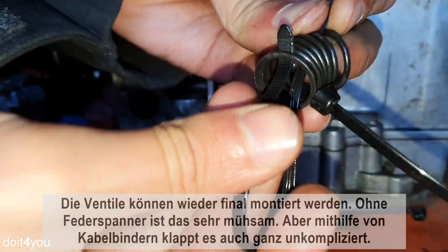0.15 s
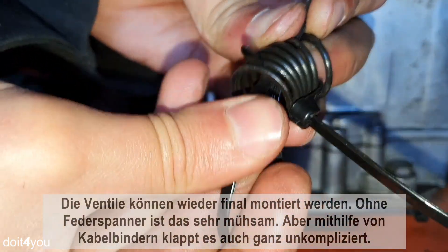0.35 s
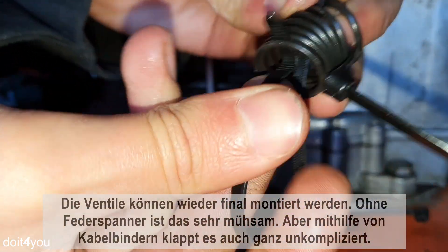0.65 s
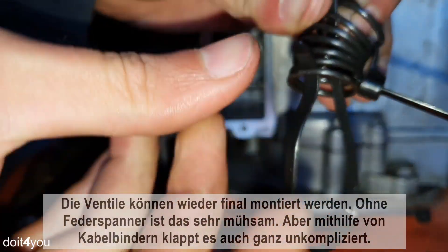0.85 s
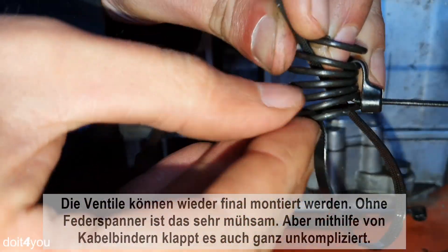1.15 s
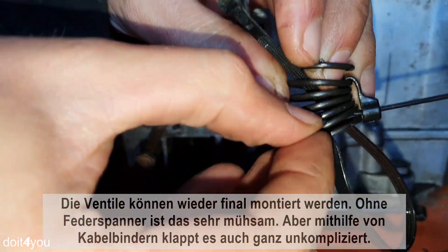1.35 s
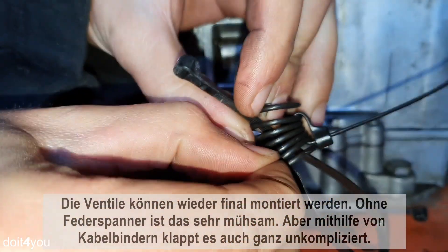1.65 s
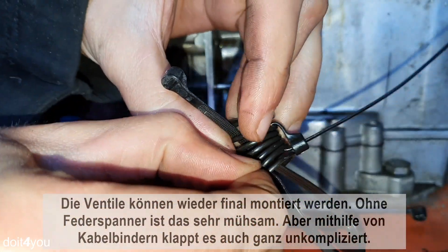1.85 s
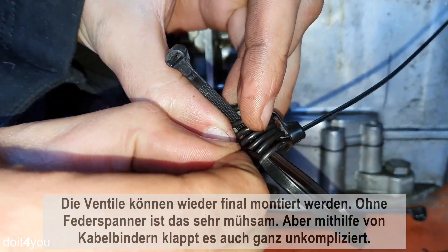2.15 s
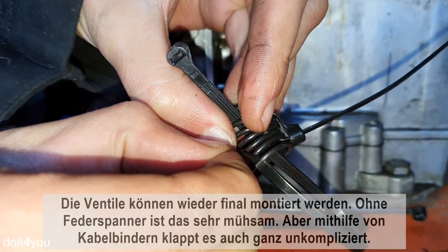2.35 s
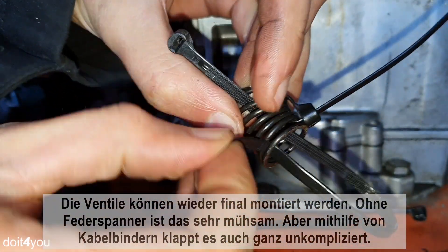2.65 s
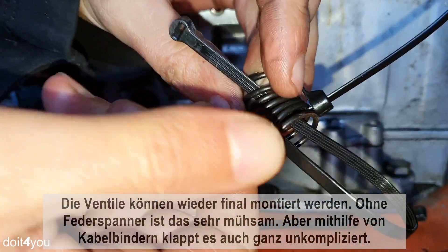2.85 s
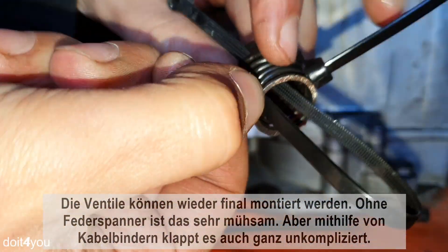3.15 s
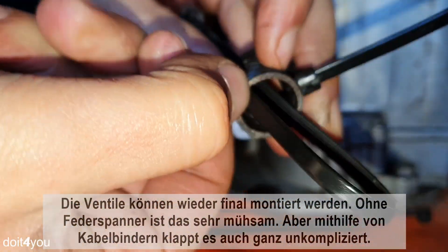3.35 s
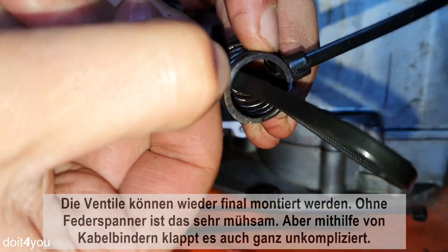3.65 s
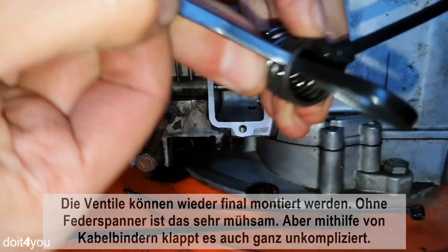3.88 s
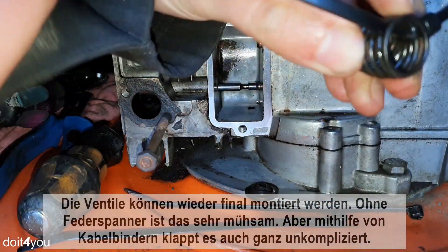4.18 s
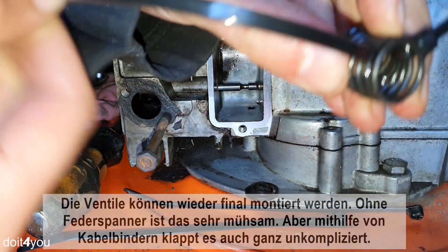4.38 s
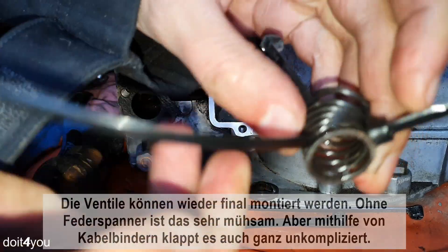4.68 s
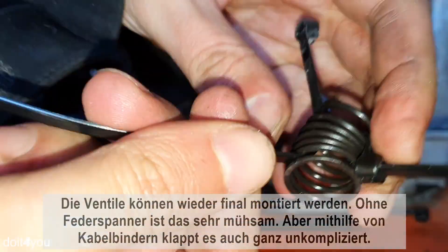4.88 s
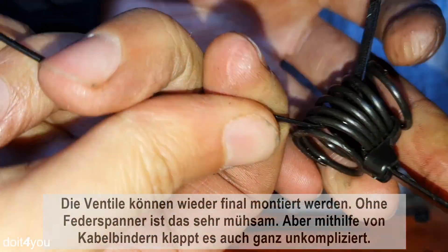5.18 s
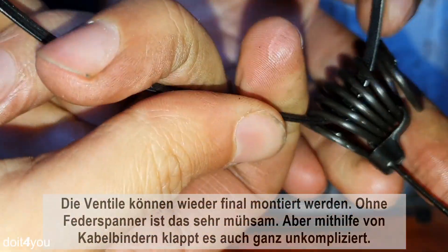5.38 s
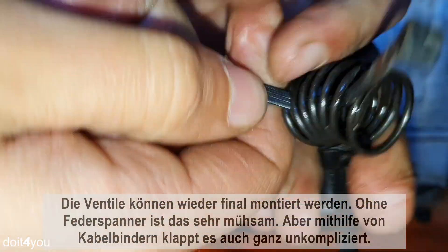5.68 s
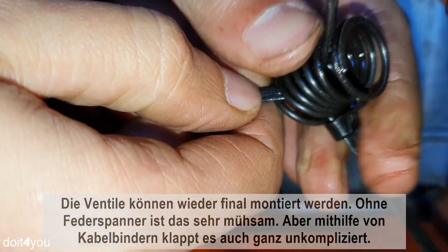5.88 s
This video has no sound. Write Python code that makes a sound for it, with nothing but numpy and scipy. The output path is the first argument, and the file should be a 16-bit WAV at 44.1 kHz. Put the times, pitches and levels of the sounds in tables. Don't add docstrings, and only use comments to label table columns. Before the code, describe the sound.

Stereo close microphone, action nearer the left side. Thin plastic straps flick sharply, then fingers slide quietly on plastic. Straps tap and knock a small metal coil several times, with short room reflections. After a quiet gap, two ratchety toothed zips sound, the second accelerating into a crackling slap. Faint scrapes, rustles and a last tight burst of clicks follow over soft building drone and hiss.

```python
import sys
import numpy as np
from scipy import signal
from scipy.fft import rfft, irfft, next_fast_len
from scipy.io import wavfile
from scipy.ndimage import uniform_filter1d, map_coordinates

SR = 44100
rng = np.random.default_rng(int(sys.argv[2]) if len(sys.argv) > 2 else 0)


def log_audio(samples):
    frames = np.atleast_2d(samples).T
    limited = np.clip(frames, -1, 1)
    pcm = np.round(limited * 32767).astype(np.int16)
    wavfile.write(sys.argv[1], SR, pcm)


def convert_level_to_amplitude(level_db):
    exponent = np.asarray(level_db, float) / 20
    return 10 ** exponent


N = 265482

# start_s, peak_db, edge_hz, body_db, sizzle_db
FLICKS = [(0.2067, -23.5, 5230, -18, 11), (0.3163, -26.5, 5500, -19, 11), (0.67, -39, 4500, -4.5, -5.5),
          (2.8605, -45, 5250, -36, -8), (3.664, -42, 3090, 2.5, -12.5), (4.534, -45, 4560, -12.5, 0),
          (5.682, -56, 2928, -28, 5.5), (5.7266, -35.5, 3800, -14.5, 7.5), (5.728, -33, 5700, -12.5, -8),
          (5.732, -40, 3740, -25, 6), (5.7352, -41, 3580, -14, -26), (5.744, -48, 4100, -14, -39),
          (5.751, -49, 4300, -3, -4)]
TEAR_S = [4.1443, 4.1454, 4.1474, 4.1483, 4.1508, 4.1524, 4.1542, 4.1551, 4.1555, 4.1562, 4.1578, 4.1636,
          4.1646, 4.1653, 4.1497, 4.1516, 4.1533]
# peak_db, edge_hz, body_db, sizzle_db
TEAR = [(-28.5, 2600, -2, -5), (-28.5, 4000, -8.5, -1), (-28.5, 3400, -7.5, -15), (-25.5, 2800, -6, -10.5),
        (-25.5, 2400, -11, -12), (-34, 2700, -6, -19), (-29.5, 3800, -0.5, -12.5), (-29.5, 6500, -5, -5),
        (-16.5, 5000, -10.5, -3.5), (-28.5, 5800, -1, -16.5), (-34, 9000, -3.5, -9.5),
        (-31.5, 2900, -1, -8.5), (-33.5, 3200, -8, -11.5), (-36, 2500, -6, -6.5), (-29.5, 3000, -6, -11.5),
        (-29.5, 2700, -3, -13.5), (-32, 3300, -4.5, -13.5)]
# start_s, peak_db, edge_hz, body_db, sizzle_db
KNOCKS = [(1.7707, -45, 5300, -2, 4), (1.832, -47, 3420, -21, -8), (1.9511, -34.5, 3700, 2, -2),
          (1.9684, -32.5, 5100, 4.5, -1.5), (1.9731, -31, 3020, -7, -1), (2.08, -35.5, 3550, -5.5, -5.5),
          (2.3172, -29.5, 3920, -12.5, -1.5), (2.318, -30.5, 2810, -15.5, -1),
          (2.472, -32, 3700, -2.5, 4.5), (2.473, -36.5, 1780, -3, -10.5), (3.6677, -43.5, 1660, -41, -19),
          (3.777, -39, 3280, -8.5, -37), (3.8423, -56, 4700, 13, 7), (4.0541, -41, 3140, 2, -8.5),
          (4.5201, -50.5, 4500, -1.5, 7.5), (4.6309, -54.5, 3640, -8.5, -17)]
# start_s, peak_db, edge_hz
TICKS = [(0.7233, -53, 6200), (0.9126, -61, 3880), (1.2296, -54, 5630), (2.7063, -57.5, 5200),
         (3.0505, -62, 3040), (3.2031, -61.5, 5320), (3.263, -69, 3410), (3.284, -63.5, 3850),
         (3.633, -61, 2940), (3.735, -60, 5060), (3.796, -67, 3700), (4.3523, -62, 5300),
         (4.4535, -70, 4300), (4.7704, -62, 3620), (4.8115, -57, 3850), (5.341, -64, 5910),
         (5.783, -54, 4520), (5.995, -72, 2470)]
TICK_BODY_DB, TICK_SIZZLE_DB, TICK_THUD_DB = -10.5, -3, -13.5
FLICK_THUD_DB, KNOCK_THUD_DB = -28, -10.5
GLANCE = 0.55
# share_of_strap_hz, width_hz, level_db
BODY = [(1, 380, 3), (1.45, 1128, -14.5)]
# share_of_edge_hz, width_hz, level_db
EDGE = [(1.403, 2700, 1.5), (0.76, 3600, 2), (1.9, 4500, -7)]
# centre_hz, width_hz, level_db
SIZZLE = [(8250, 1600, -5), (10860, 5900, -1.5), (15700, 5400, -6)]
# centre_hz, width_hz, level_db
THUD = [(307, 26, 2), (718, 400, -1)]
RING_ECHO_DB, RING_BLUR = -2, 3.5
RING_LEAD = 6

# time_s, teeth_per_s, level_db, ring_hz, scatter_0_to_1
DRAGS = [
    [(3.843, 310, -45, 1880, 0), (3.858, 280, -40, 1580, 0.35)],
    [(3.8608, 278, -23.5, 1760, 0.08), (3.876, 290, -19.5, 1730, 0.04), (3.8935, 296, -22.5, 1610, 0.14)],
    [(3.8955, 395, -36, 1880, 0.4), (3.909, 310, -28.5, 1900, 0.3), (3.927, 304, -28.5, 1950, 0.04),
     (3.937, 170, -40.5, 1430, 0.35)],
    [(4.055, 280, -34, 1570, 0.02), (4.068, 380, -33.5, 1770, 0.25), (4.079, 450, -32.5, 1713, 0.25)],
    [(4.0805, 800, -29.5, 1640, 0.12), (4.09, 868, -27, 1770, 0.08), (4.1, 875, -31, 1690, 0.07),
     (4.108, 926, -27, 1850, 0.11), (4.114, 990, -26, 1980, 0.05), (4.122, 1095, -25.5, 2160, 0.17),
     (4.1285, 1120, -33.5, 2240, 0.07)],
    [(4.1304, 295, -17.5, 1985, 0.14), (4.142, 300, -19, 2190, 0.16), (4.1445, 390, -30.5, 2250, 0.4),
     (4.153, 570, -31, 1434, 0.42), (4.162, 770, -40.5, 1126, 0.1)],
]
TOOTH_T60 = [0.012, 0.0081, 0.009, .008, 0.0064, .011]
TOOTH_BRIGHT_DB = [8, 0, 4.5, 0, 0.5, 5.5]
TOOTH_RISE_S = 0.00025
OVERTONE_DB, OVERTONE_T60, OVERTONE_GROW_DB = -13.5, 0.0076, 0.5
GRIT_DB, GRIT_FOLLOWS = -48, 0.29
PUSH_DB, PUSH_FADE_DB, PUSH_FOLLOWS = -8, 5.5, 0.65
AIR_HZ = 130
BUZZ_ECHO_DB = -5.5

# time_s, level_db, ring_hz
SCRAPE = [(4.399, -88, 3600), (4.41, -77, 3600), (4.429, -68, 3700), (4.441, -105, 3830),
          (4.455, -66, 4060), (4.476, -74, 3960), (4.509, -67, 3560), (4.53, -100, 3500)]
# start_s, length_s, level_db, pitch_hz, width_hz
SLIDES = [(1.06, 0.2, -85, 2580, 153), (1.08, 0.12, -87, 1180, 150), (4.352, 0.025, -84.5, 5350, 706),
          (4.355, 0.032, -86, 11300, 886), (4.385, 0.039, -74, 10800, 1780), (4.4, 0.03, -74.5, 5650, 904),
          (4.415, 0.02, -82, 2760, 250), (4.469, .05, -74, 9200, 900), (4.488, .03, -78, 5000, 700),
          (4.654, 0.17, -83, 1730, 110), (4.959, 0.19, -80.5, 1200, 200), (4.959, .22, -84, 1720, 151),
          (5.034, 0.11, -82, 2050, 200), (5.875, .14, -80.5, 1726, 100)]
SLIDE_FADE_S = 0.0088
# time_s, ring_lost_at_right_port_db, thinnest_sizzle_db
FACING = [(0.2, 17, 1.5), (0.32, 11.5, -13.5), (0.67, 14.5, -4.5), (1.499, 14, 0.5), (1.9, -1.5, 2),
          (2.32, -7, -3.5), (2.5, -4.5, -3), (3.6, 17, -4), (3.85, 6.5, 3), (4.1, 14.5, -0.5),
          (4.14, 12.5, -16.5), (4.153, 3.5, -9.5), (4.155, 4.5, 10), (4.169, 5, -2), (5.6, 0, 0),
          (5.72, 5, 1.5)]
# time_s, right_port_shade_db, free_strap_hz
GRIP = [(0, 7, 1397), (1.4, 15, 1402), (1.7, 7.5, 2140), (1.96, 4.5, 2110), (2.1, 9.5, 2210),
        (2.32, 6, 1670), (2.47, 4.5, 2080), (3.66, 15, 1770), (3.78, 15.5, 1820), (3.9, 4.5, 1850),
        (4.1, 7, 1830), (4.14, 5.5, 2500), (4.156, 4, 3030), (4.162, 12, 1040), (4.5, 20.5, 1667),
        (5.7, 35, 1976), (5.72, 4.5, 2480), (6.02, -14, 2200)]
# frequency_hz, share_of_shade
SHADE = [(150, 1.1), (500, 11), (1300, 0.091), (6000, 6.4), (10000, 1.9), (14000, 0.13)]

# start_s, length_s, level_db, pressure_0_to_1
RUBS = [(0.0, 0.026, -85, 0), (0.706, 0.12, -75.5, 0), (0.872, 0.13, -82, 0.1), (1.059, 0.26, -85.5, 0.4),
        (1.251, 0.2, -81.5, 0.45), (1.498, 0.15, -85.5, 0.34), (2.172, 0.055, -88.5, 0.57),
        (1.652, 0.22, -82, 0.5), (1.998, 0.14, -81, 0.66), (2.686, 0.07, -78.5, 0.4),
        (2.787, 0.26, -81.5, 0.46), (3.133, 0.14, -88, 0.65), (3.383, 0.082, -88, 0.55),
        (3.682, 0.3, -80, 0.93), (3.919, 0.018, -67.5, 0.4), (4.184, 0.099, -79.5, 0.46),
        (4.402, 0.087, -79, 0), (4.525, 0.011, -68, 0.48), (4.562, 0.088, -77.5, 0.3),
        (4.706, 0.19, -83, 0.68), (4.967, 0.26, -79, 0.48), (5.359, 0.063, -85.5, 0.25),
        (5.686, 0.081, -72.5, 0.08), (5.736, 0.13, -74.5, 0.16), (5.921, 0.033, -70.5, 0.14),
        (5.983, 0.05, -76.5, 0.57), (0.233, 0.13, -75.5, 0.15), (2.348, 0.032, -76, 0.6),
        (2.514, 0.023, -74.5, 0.5)]
REST_DB, REST_FINE_DB, REST_LOW_DB = -90, -89, -84
PRESS_FINE_DB, LIGHT_LOW_DB, PRESS_LOW_DB = -7, -7, 15.5
RUB_ATTACK_S, RUB_RELEASE_S, RUB_LINGERS = 0.039, 0.011, 0.12
# frequency_hz, level_db_per_hz
LOW_RUSTLE = [(190, -16.5), (330, -3.5), (744, -11), (947, -17.5), (1110, -16.5), (1500, -16), (1720, -17),
              (2400, -21.5), (3120, -62), (5280, -120)]
# frequency_hz, level_db_per_hz
RUSTLE = [(1180, -24.5), (2000, -5), (2380, -4.5), (2570, -1.5), (3160, 0), (3680, 0), (5980, -0.5),
          (7600, -6), (9880, -41.5), (16700, -120)]
# frequency_hz, level_db_per_hz
FINE_RUSTLE = [(4240, -33), (7200, -12.5), (7380, -12.5), (8300, 1.5), (11400, 5), (15100, 0.5),
               (16100, -2), (16500, -25)]
# start_s, peak_db, pitch_hz, left_right_db
BUMPS = [(1.768, -53, 174, 4), (1.951, -44.5, 161, 7), (1.968, -40, 201, 5), (2.318, -44, 202, 4.5),
         (2.475, -45, 130, 9.5), (3.845, -44.5, 103, 23), (3.861, -60, 59, 40), (4.057, -40, 110, 17),
         (4.127, -43.5, 61, 11), (4.149, -39, 110, 14.5), (4.171, -43.5, 55, 8.5), (4.51, -44, 74.6, 2)]

# frequency_hz, t60_s
CLUTTER = [(500, 0.17), (3000, 0.04), (12000, 0.019)]
# frequency_hz, t60_s
ROOM = [(300, 0.069), (2000, 0.18), (6000, 0.073), (14000, 0.11)]
# time_s, rumble_db, drone_db
BUILDING = [(0.0, -62, -71.5), (0.7, -65.5, -74), (1.0, -60.5, -70.5), (1.35, -61, -70.5),
            (1.65, -65.5, -73.5), (1.93, -64.5, -69), (2.48, -64, -70), (3.45, -63.5, -73),
            (3.72, -65, -67), (4.0, -59.5, -66), (4.7, -70, -66), (5.4, -65.5, -68.5), (6.02, -66, -63)]
# frequency_hz, level_db_per_hz
RUMBLE = [(12, -47.5), (25, -20.5), (63, -4.5), (75, -1), (95, -6), (119, -17.5), (146, -11), (162, -11.5),
          (190, -18.5), (250, -55), (420, -120)]
# frequency_hz, level_db_per_hz
DRONE = [(100, -38.5), (170, -4.5), (188, -14.5), (212, -5), (243, 0.5), (333, -18.5), (361, -20),
         (404, -34.5), (520, -22.5), (680, -54.5), (1140, -120)]
# frequency_hz, likeness_0_to_1
BUILDING_ALIKE = [(60, 0.87), (130, 0.94), (290, 0.77), (500, 0.15)]
# frequency_hz, gain_db
MICROPHONE = [(6700, -0.5), (7500, -6), (8300, -1.5), (15300, -6.5), (16300, -15.5), (16800, -41.5)]
# from_s, to_s
LETS_GO = [(0.195, 0.2055), (0.2995, 0.3152), (1.941, 1.951), (2.3, 2.316), (2.459, 2.4708), (4.042, 4.053)]
HUSH_DB, HUSH_HZ = -28, 3200


def unit(x):
    return x / np.sqrt(np.mean(x ** 2) + 1e-20)


def unit_energy(x):
    return x / np.linalg.norm(x, axis=-1, keepdims=True)


def along(points, hz):
    f, v = np.transpose(points)
    return np.interp(np.log(hz + 1), np.log(f + 1), v)


def wobble(rate):
    return map_coordinates(rng.standard_normal(N // 100), [np.arange(N) * rate / SR])


def filtered(x, response):
    n = x.shape[-1]
    m = next_fast_len(n + 4096)
    return irfft(rfft(x, m) * response(np.fft.rfftfreq(m, 1 / SR)), m)[..., :n]


def resonant(x, modes, scale=1):
    def bank(f):
        total = 0
        for k, (centre, width, db) in enumerate(modes):
            damping = 1j * f * width
            total = total + (-1) ** k * convert_level_to_amplitude(db / 2) * damping / ((centre * scale) ** 2 - f * f + damping)
        return total
    return filtered(x, lambda f: bank(f) ** 2)


def rush(spectrum, alike, patchy_db):
    z = signal.stft(rng.standard_normal((2, N)), nperseg=512)[2]
    field = uniform_filter1d(rng.standard_normal(z.shape[1:]), size=6, axis=0)
    field = uniform_filter1d(field, size=12, axis=1)
    pair = signal.istft(z * convert_level_to_amplitude(patchy_db * unit(field)), nperseg=512)[1][:, :N]

    def mid_side(hz):
        turn = np.arccos(np.clip(along(alike, hz), -1, 1)) / 2
        return convert_level_to_amplitude(along(spectrum, hz)) * np.array([np.cos(turn), np.sin(turn)])
    mid, side = filtered(pair, mid_side)
    return unit(np.array([mid + side, mid - side]))


def facing(s):
    when, lost_db, top_db = np.transpose(FACING)
    return convert_level_to_amplitude([[0], [-np.interp(s, when, lost_db)]]), np.interp(s, when, top_db)


def snap_events():
    free = FLICKS + [(s, *r) for s, r in zip(TEAR_S, TEAR)]
    rows = [(*r, FLICK_THUD_DB - GLANCE * r[-1]) for r in free]
    rows += [(*r, KNOCK_THUD_DB) for r in KNOCKS]
    return rows + [(*r, TICK_BODY_DB, TICK_SIZZLE_DB, TICK_THUD_DB) for r in TICKS]


def blow(t, crack_t60, rattle, unlike):
    shared, own = rattle * rng.standard_normal((2, len(t))) * convert_level_to_amplitude(-60 * t / crack_t60)
    impact = (t == 0) * np.array([[1], [0.6]])
    crack = rfft(impact + np.array([shared, shared + unlike * own]))
    crack = irfft(crack / np.sqrt(uniform_filter1d(np.abs(crack) ** 2, size=18)))
    crack[:, len(t) // 2:] = 0
    return np.roll(crack, RING_LEAD, axis=1)


def snaps(crack_t60, rattle, unlike):
    out, t = np.zeros((3, N + 2048)), np.arange(2048) / SR
    for s, db, edge_hz, body_db, sizzle_db, thud_db in snap_events():
        crack = blow(t, crack_t60, rattle, unlike)
        ports, top_db = facing(s)
        strap_hz = np.interp(s, *np.transpose(GRIP)[::2])
        thin = SIZZLE[:-1] + [np.add(SIZZLE[-1], [0, 0, top_db])]
        edge = unit_energy(resonant(crack, EDGE, edge_hz))
        sizzle = convert_level_to_amplitude(sizzle_db - 0.5) * unit_energy(resonant(crack, thin))
        thud = convert_level_to_amplitude(thud_db + 5) * unit_energy(resonant(crack, THUD))
        body = resonant(crack, BODY, strap_hz)
        body[1] = np.roll(body[1], -RING_LEAD)
        body = convert_level_to_amplitude(body_db - 0.5) * unit_energy(body)
        snap = edge + ports * body + sizzle + thud
        wide = unit_energy(resonant(crack[0], np.multiply(BODY, [1, RING_BLUR, 1]), strap_hz))
        heard = snap[0] - body[0] + convert_level_to_amplitude(body_db - 0.5 + RING_ECHO_DB) * wide
        at = round(s * SR) - RING_LEAD
        out[:, at:at + len(t)] += convert_level_to_amplitude(db + 17.5) * np.vstack([snap, heard])
    return out[:, :N]


def tooth(t, when, rate, db, hz, tune, ring_t60, bright_db, thud_hz):
    ports = facing(when)[0]
    rise = 1 - np.exp(-t / TOOTH_RISE_S)
    octaves = np.log2(rate / 300)
    turn = 2 * np.pi * hz * (1 + 0.3 * tune) * t
    strap = np.sin(turn) + 0.55 * np.sin(0.8 * turn) + 0.23 * np.sin(1.18 * turn)
    pluck = convert_level_to_amplitude(-60 * t / ring_t60) * rise ** 2 * strap * ports
    upper = 1.5 * rate / 900 * np.sin(1.5 * turn) * ports
    upper = upper + np.sin(1.8 * turn) + 0.6 * np.sin(2.45 * turn) + 0.09 * np.sin(2.5 * turn)
    high = convert_level_to_amplitude(OVERTONE_DB + bright_db + OVERTONE_GROW_DB * octaves - 60 * t / OVERTONE_T60) * upper
    spring = np.sin(2 * np.pi * max(thud_hz, rate) * t)
    spring = spring + 0.77 * np.sin(2 * np.pi * 620 * t) + 0.88 * np.sin(2 * np.pi * 890 * t)
    push_db = PUSH_DB - PUSH_FADE_DB * octaves - (1 - PUSH_FOLLOWS) * (db + 28.0)
    push = convert_level_to_amplitude(push_db - 60 * t / 0.0096) * spring
    tick_db = GRIT_DB - db + GRIT_FOLLOWS * (db + 31)
    tick = np.diff(rng.standard_normal((2, len(t) + 1))) * convert_level_to_amplitude(tick_db - 60 * t / 0.017)
    return pluck + tick + (high + push) * rise


def drags(thud_hz):
    out, t = np.zeros((2, N + 1024)), np.arange(1024) / SR
    for rows, ring_t60, bright_db in zip(DRAGS, TOOTH_T60, TOOTH_BRIGHT_DB):
        s, *cols = np.transpose(rows)
        now = np.arange(s[0], s[-1], 1 / SR)
        passed = np.floor(np.cumsum(np.interp(now, s, cols[0])) / SR + 0.9)
        for when in now[np.nonzero(np.diff(passed))[0]]:
            rate, db, hz, scatter = [np.interp(when, s, c) for c in cols]
            late, size, tune = rng.standard_normal(3) * scatter
            level = convert_level_to_amplitude(db + 6 * size + 0.5 * rng.standard_normal())
            at = round((when + 0.4 * late / rate) * SR)
            sound = tooth(t, when, rate, db, hz, tune, ring_t60, bright_db, thud_hz)
            out[:, at:at + len(t)] += level * sound
    return filtered(out[:, :N], lambda hz: 1j * hz / (AIR_HZ + 1j * hz))


def scrape(width, grit_db):
    s, db, hz = np.transpose(SCRAPE)
    now = np.arange(N) / SR
    turn = 2 * np.pi * np.cumsum(np.interp(now, s, hz)) / SR
    slow = filtered(rng.standard_normal((2, N)), lambda f: 1 / (1 + (f / min(width, 380)) ** 2))
    grit = convert_level_to_amplitude(grit_db * wobble(220)) * unit(slow)
    ring = grit[0] * np.sin(turn) + grit[1] * np.cos(turn)
    return convert_level_to_amplitude(7.5) * convert_level_to_amplitude(np.interp(now, s, db, -200, -200)) * ring


def slides():
    out = np.zeros((2, N + SR))
    for s, length, db, hz, width in SLIDES:
        t = np.arange(round((length + 8 * SLIDE_FADE_S) * SR)) / SR - 4 * SLIDE_FADE_S
        shape = np.exp(np.minimum(0, t / SLIDE_FADE_S) - np.maximum(0, t - length) / SLIDE_FADE_S)
        song = unit(resonant(rng.standard_normal((2, len(t))), [(hz, width, 0)]))
        at = round((s + t[0]) * SR)
        out[:, at:][:, :len(t)] += convert_level_to_amplitude(db) * shape * song
    return convert_level_to_amplitude([[4], [1]]) * out[:, :N]


def rustle_levels():
    now = np.arange(0, N + 64, 64) / SR
    start, length, db, press = np.transpose(RUBS)[:, :, None]
    swell = np.minimum(0, (now - start) / RUB_ATTACK_S)
    fade = np.maximum(0, now - start - length) / (RUB_RELEASE_S + RUB_LINGERS * length)
    shape = np.exp(swell - fade)
    layers = [(REST_DB, 0), (REST_FINE_DB, PRESS_FINE_DB * press),
              (REST_LOW_DB, LIGHT_LOW_DB + PRESS_LOW_DB * press)]
    power = [convert_level_to_amplitude(2 * rest) + np.sum((convert_level_to_amplitude(db + tilt) * shape) ** 2, axis=0) for rest, tilt in layers]
    return [np.interp(np.arange(N) / SR, now, 10 * np.log10(p)) for p in power]


def skin_rustle():
    mid_db, fine_db, low_db = rustle_levels()
    slip = wobble(23)
    low = convert_level_to_amplitude(low_db + 3.5 + 0.6 * slip) * rush(LOW_RUSTLE, [(400, 0.7), (1300, 0.05)], patchy_db=1)
    mid = convert_level_to_amplitude(mid_db + 3.5 + 0.8 * slip) * rush(RUSTLE, [(3000, 0.03)], patchy_db=1)
    fine = convert_level_to_amplitude(fine_db + 3.5 + 0.8 * slip) * rush(FINE_RUSTLE, [(9000, 0.03)], patchy_db=0.7)
    lean_db = np.clip(0.18 * (mid_db + 109.0), 0, 4)
    return (low + mid + fine) * convert_level_to_amplitude(np.array([lean_db, -lean_db]))


def bumps():
    out, t = np.zeros((2, N + 4096)), np.arange(4096) / SR
    for s, db, hz, pan_db in BUMPS:
        push = convert_level_to_amplitude(db + 3.0 - 16 * hz * t) * np.sin(2 * np.pi * hz * t)
        at = round(s * SR)
        out[:, at:at + len(t)] += push * convert_level_to_amplitude(np.array([[pan_db / 2], [-pan_db / 2]]))
    return out[:, :N]


def shaded(x, lead):
    s, shade_db, _ = np.transpose(GRIP)
    depth = np.clip(np.interp(np.arange(N) / SR, s, shade_db), 0, 24) / 24
    clear, half, full = [filtered(x[1], lambda hz: convert_level_to_amplitude(-db * along(SHADE, hz))) for db in (0, 12, 24)]
    light = clear + (half - clear) * (2 * depth) ** 0.5
    heavy = half + (full - half) * np.abs(2 * depth - 1) ** 0.5
    right = np.where(depth < 0.5, light, heavy)
    return np.array([x[0], np.roll(right, int(lead))])


def echo(x, decays, wait):
    out, step = np.zeros((2, N + 2 * SR)), SR // 10
    for k in range(0, N, step):
        hz, t, z = signal.stft(rng.standard_normal((2, SR // 3)), SR, nperseg=128)
        tail = signal.istft(z * convert_level_to_amplitude(-60 * t / along(decays, hz)[:, None]), SR, nperseg=128)[1]
        wet = signal.fftconvolve(x[None, k:k + step], tail / np.linalg.norm(tail[0]), axes=1)
        out[:, k + int(wait):][:, :wet.shape[1]] += wet
    return out[:, :N]


def building():
    s, *cols = np.transpose(BUILDING)
    rumble_db, drone_db = [np.interp(np.arange(N) / SR, s, c) for c in cols]
    rumble = convert_level_to_amplitude(rumble_db + 4.5) * rush(RUMBLE, BUILDING_ALIKE, patchy_db=0.0)
    drone = convert_level_to_amplitude(drone_db + 5.0) * rush(DRONE, BUILDING_ALIKE, patchy_db=3.0)
    return rumble + drone


def scene():
    clicks = snaps(crack_t60=0.006, rattle=0.19, unlike=0.97)
    buzz = convert_level_to_amplitude(2.5) * drags(thud_hz=272) + scrape(width=430, grit_db=2)
    spread = clicks[2] + convert_level_to_amplitude(BUZZ_ECHO_DB) * buzz[0]
    near = convert_level_to_amplitude([[-16], [-20]]) * echo(spread, CLUTTER, wait=43)
    far = convert_level_to_amplitude(-19.5) * echo(spread, ROOM, wait=300)
    ties = shaded(clicks[:2] + buzz, lead=8.8) + slides()
    return ties + skin_rustle() + bumps() + near + far + building()


def roll_off(x):
    return signal.sosfilt(signal.butter(12, 16970, fs=SR, output="sos"), x)


def record(dry):
    hiss = convert_level_to_amplitude(-94.5) * rng.standard_normal(dry.shape)
    x = filtered(dry + hiss, lambda hz: convert_level_to_amplitude(along(MICROPHONE, hz)))
    now = np.arange(N) / SR
    held = sum((now > a) & (now < b) for a, b in LETS_GO)
    hush = uniform_filter1d(1.0 * held, size=40)
    treble = filtered(x, lambda hz: 1 / (1 + (HUSH_HZ / (hz + 1)) ** 8))
    mix = x - treble * (1 - convert_level_to_amplitude(HUSH_DB * hush))
    return roll_off(mix)


dry = scene()
out = record(dry)
log_audio(out)
```